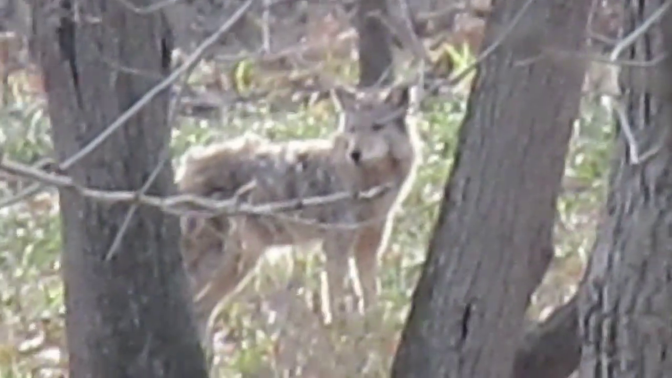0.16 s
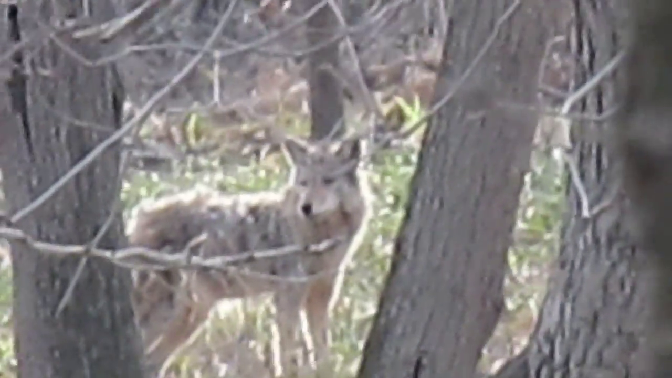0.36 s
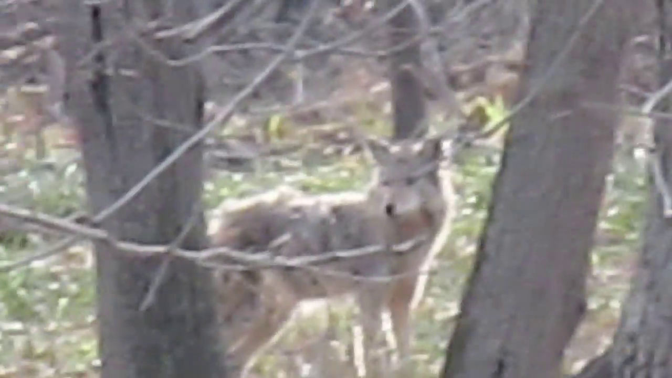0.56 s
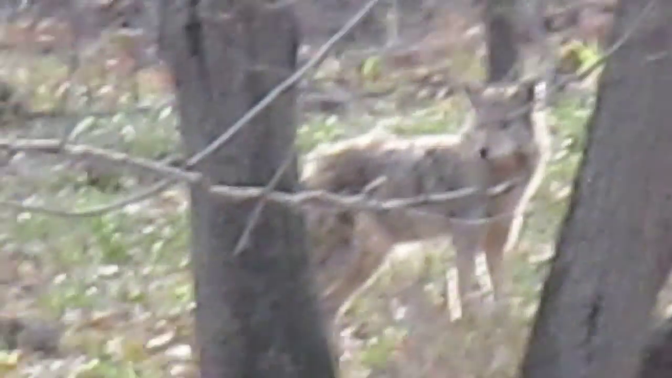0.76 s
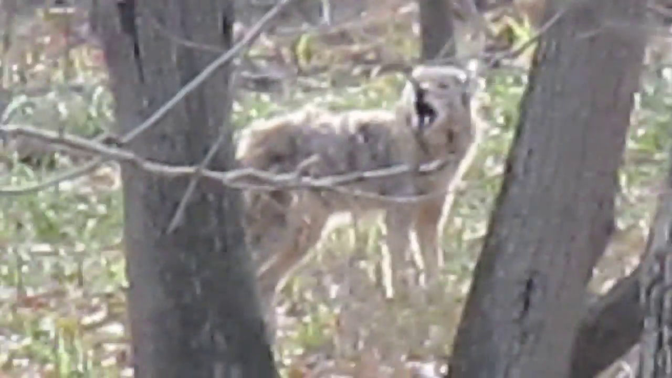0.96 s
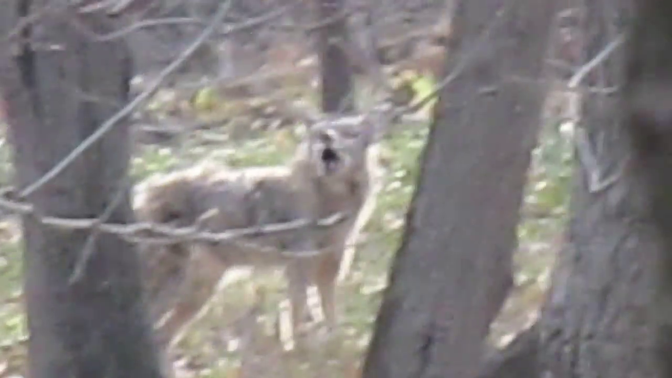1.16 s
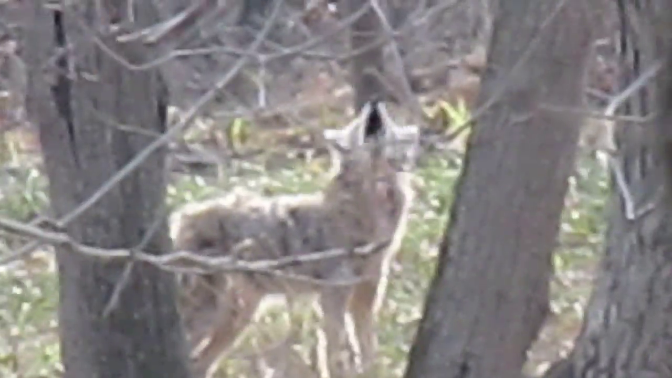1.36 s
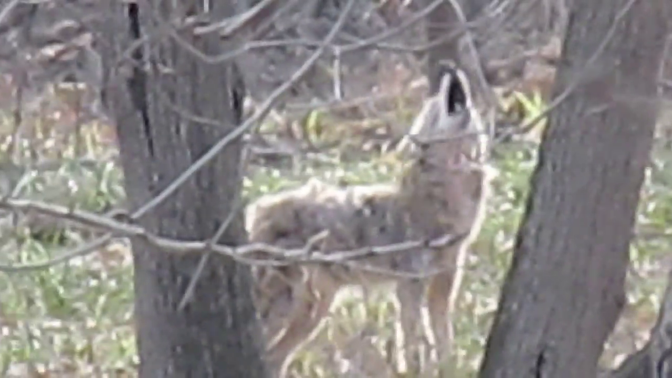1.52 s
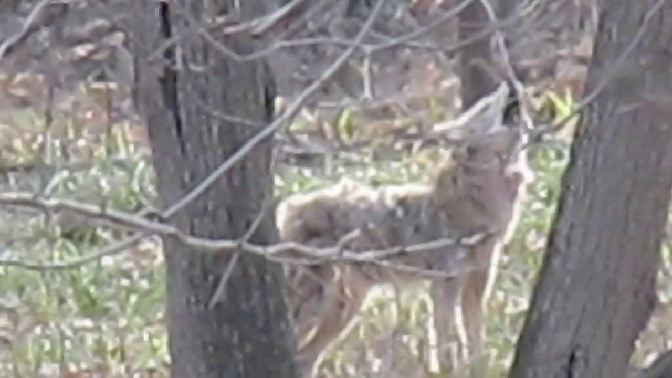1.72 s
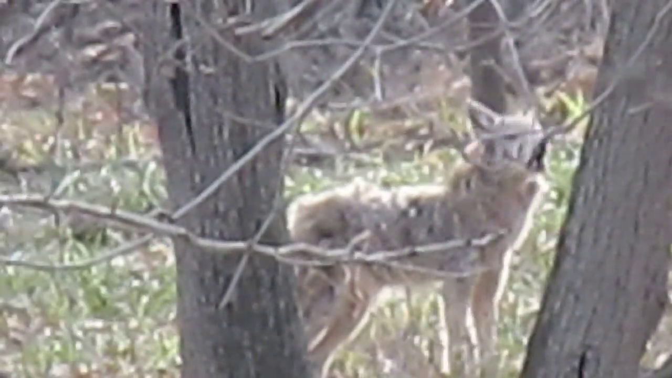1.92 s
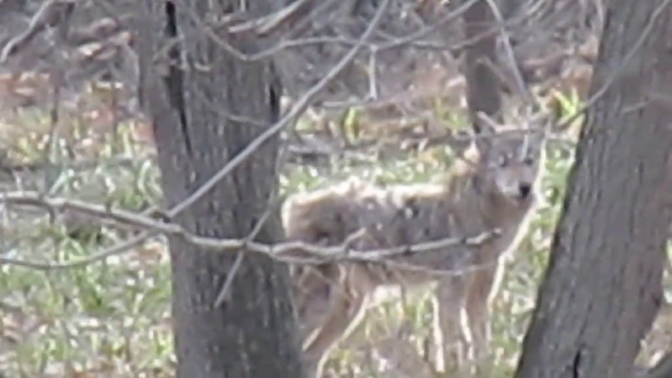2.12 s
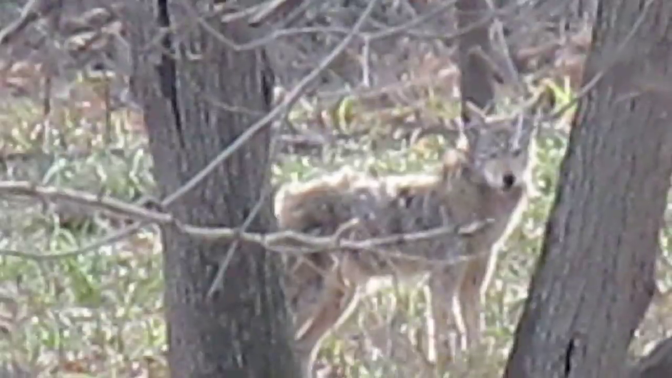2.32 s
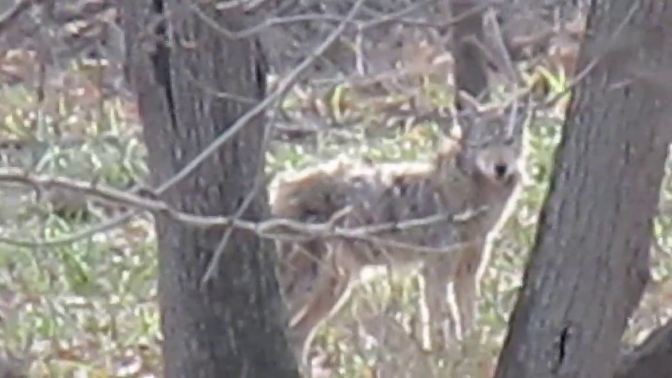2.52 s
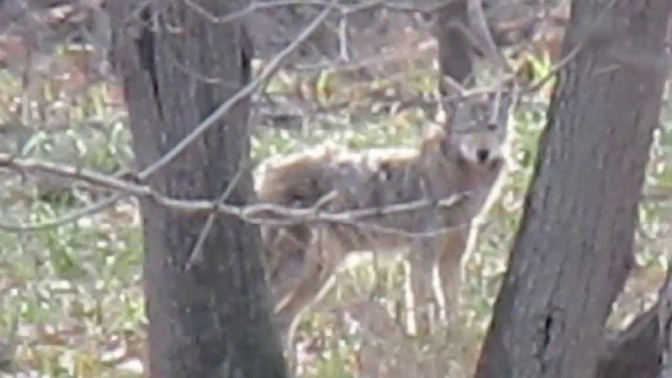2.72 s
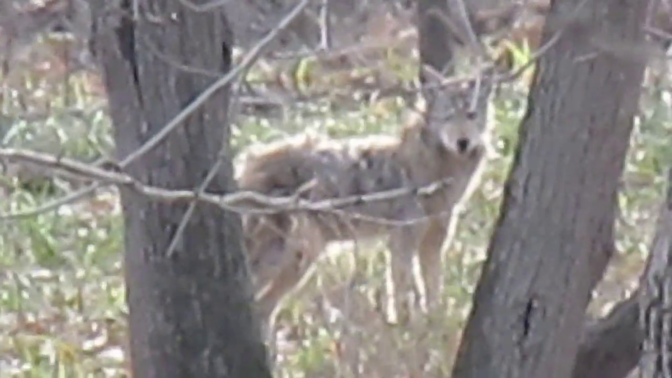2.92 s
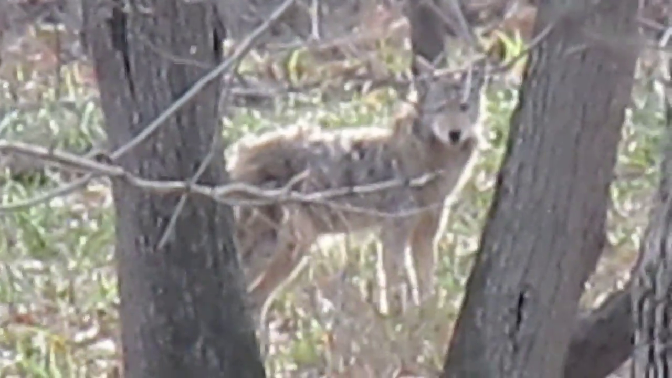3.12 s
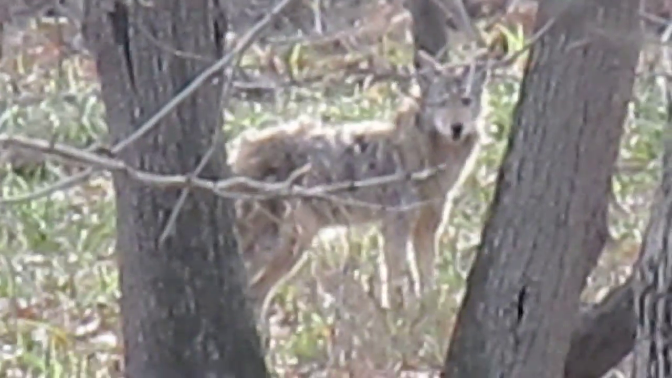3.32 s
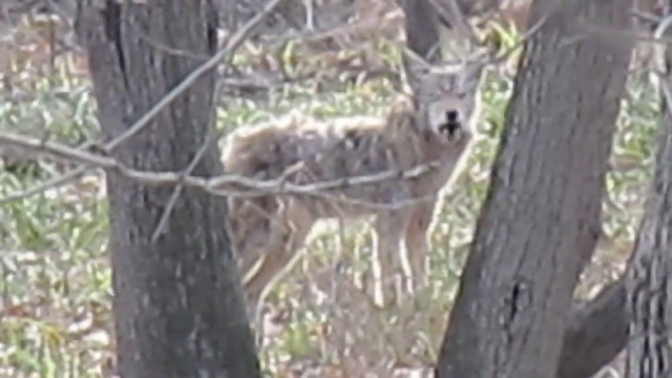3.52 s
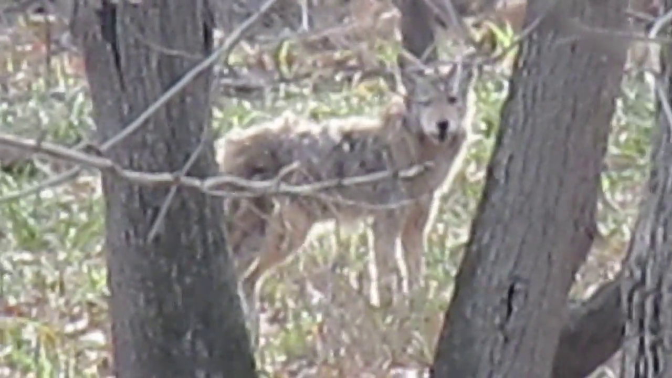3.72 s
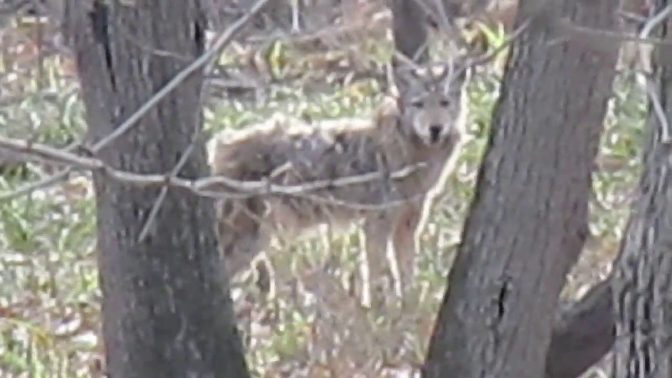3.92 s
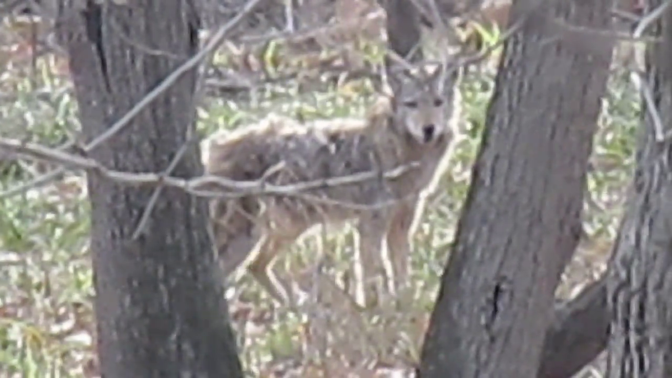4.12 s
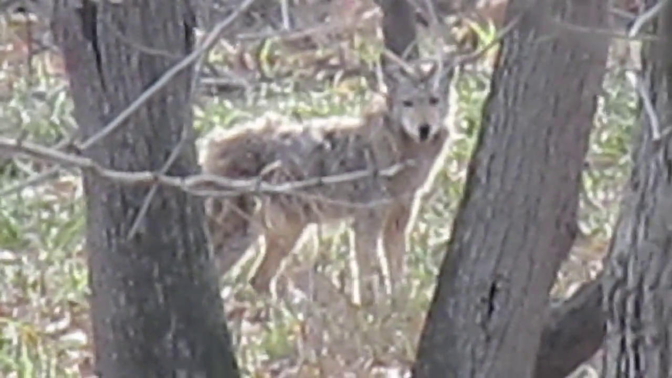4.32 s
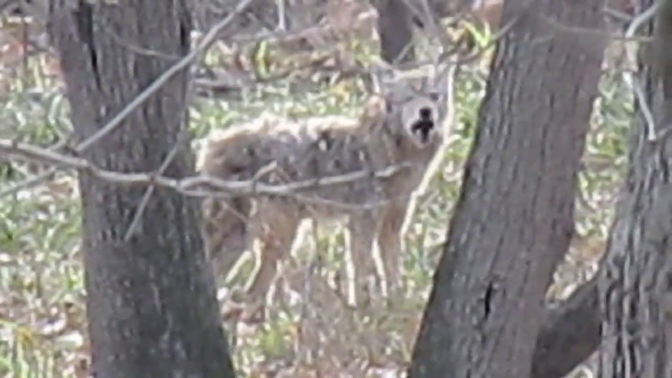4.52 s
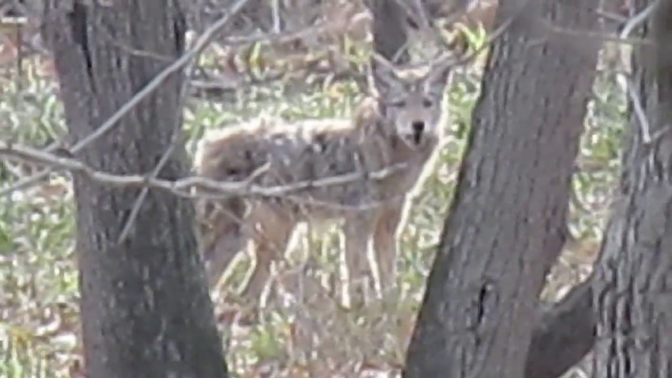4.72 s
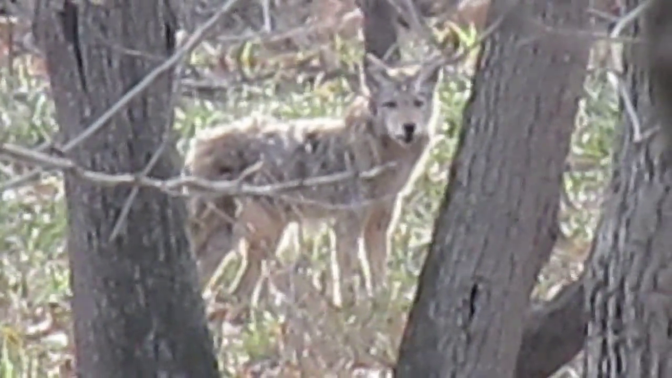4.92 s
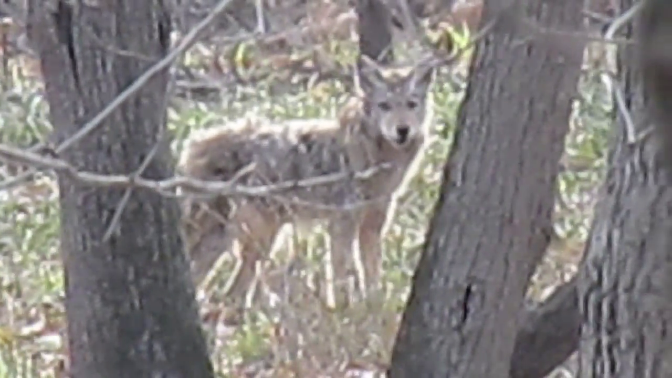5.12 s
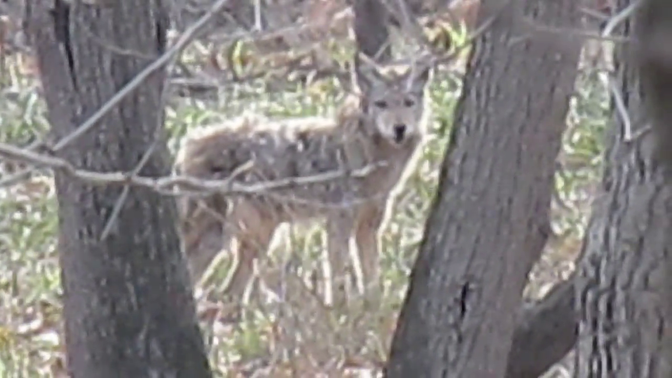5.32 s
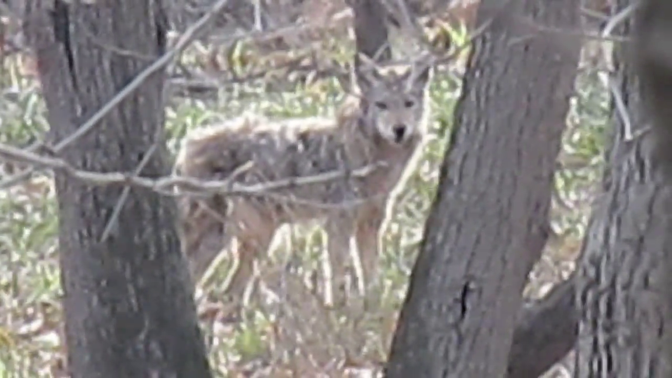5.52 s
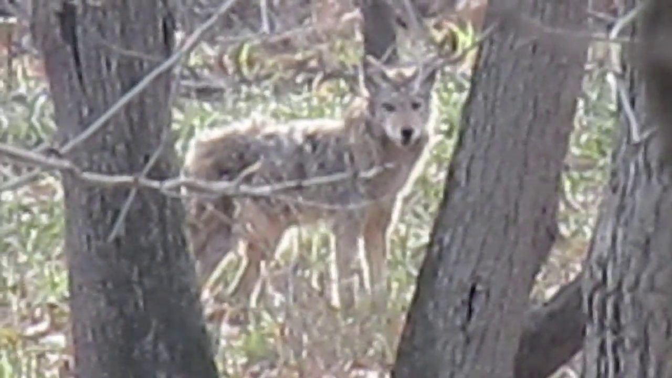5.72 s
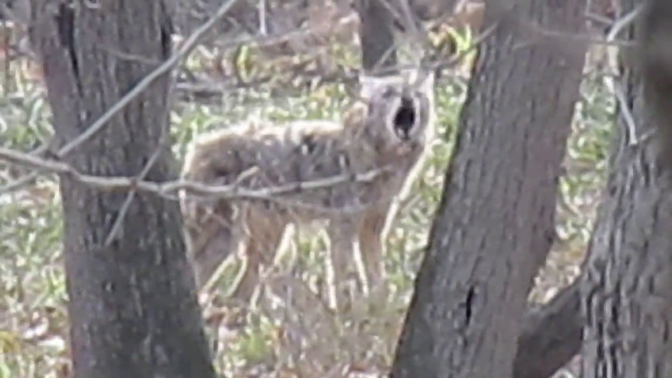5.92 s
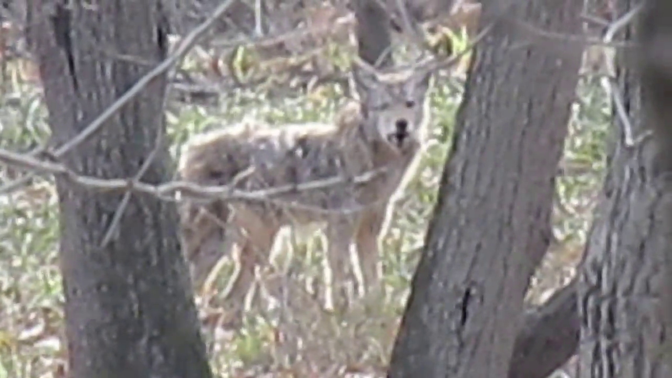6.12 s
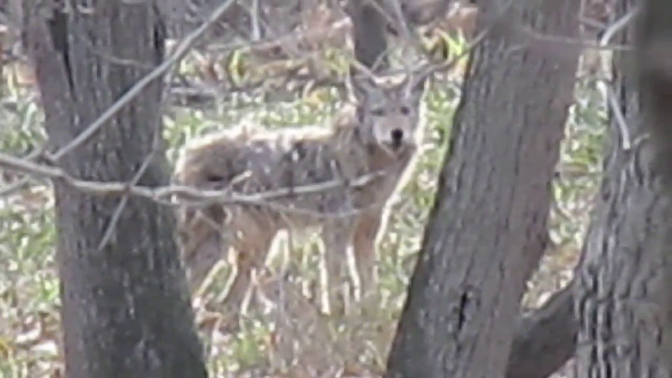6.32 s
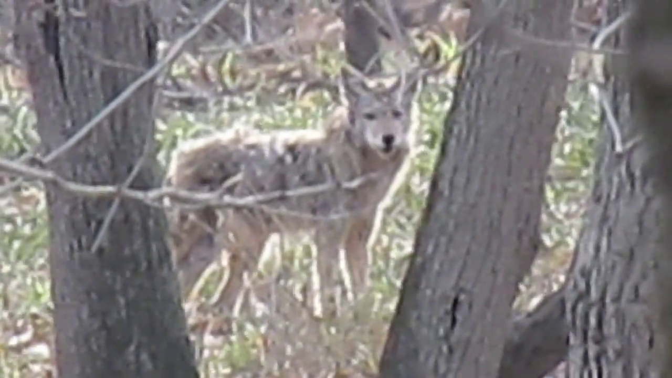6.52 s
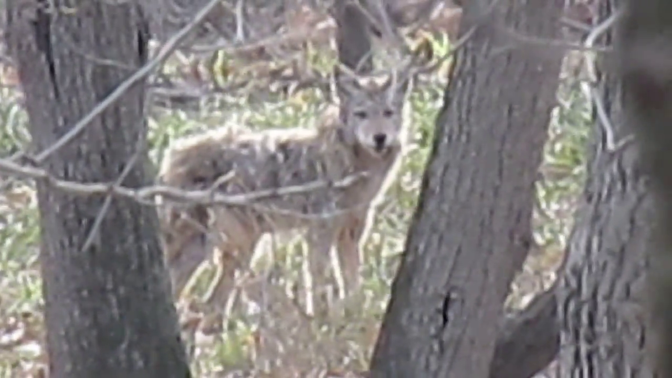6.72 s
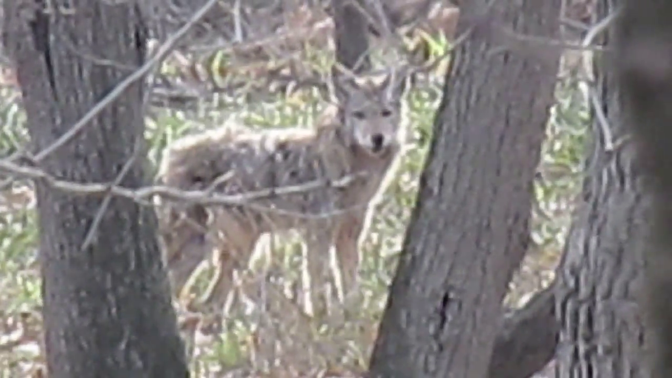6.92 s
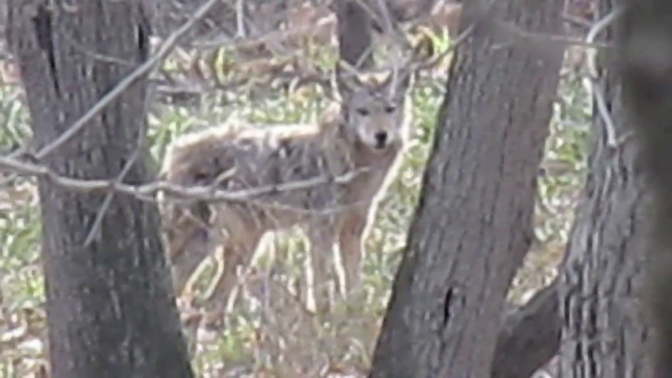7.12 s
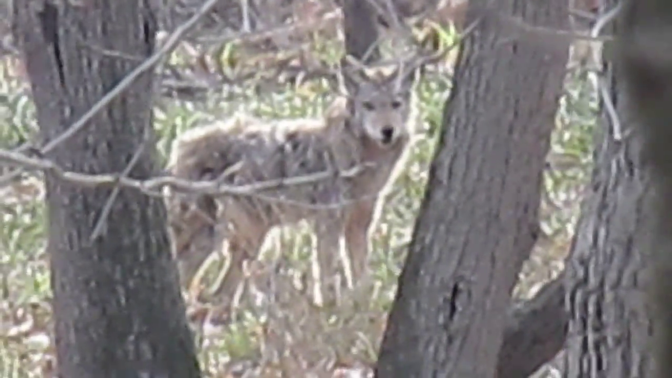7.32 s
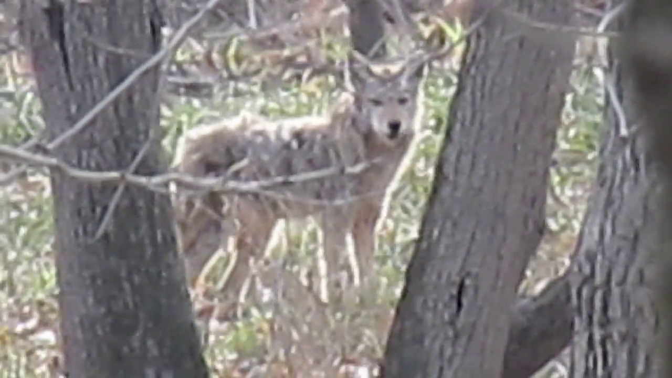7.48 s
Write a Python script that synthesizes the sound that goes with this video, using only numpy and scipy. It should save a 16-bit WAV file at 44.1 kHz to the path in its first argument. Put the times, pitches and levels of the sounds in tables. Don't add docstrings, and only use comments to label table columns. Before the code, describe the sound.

Sharp coyote barks and a quick run of yips ring among trees, answered by a dog's low woofs, rustling leaves and faint distant road rumble.

```python
import sys
import numpy as np
from scipy import signal
from scipy.fft import rfft, irfft, next_fast_len
from scipy.io import wavfile
from scipy.ndimage import uniform_filter1d, map_coordinates

SR = 44100
rng = np.random.default_rng(int(sys.argv[2]) if len(sys.argv) > 2 else 0)


def convert_level_to_amplitude(level_db):
    exponent = np.asarray(level_db, float) / 20
    return 10 ** exponent


def wrap_up_sound(samples):
    columns = np.atleast_2d(samples).T
    tamed = np.clip(columns, -1, 1)
    steps = np.round(tamed * 32767).astype(np.int16)
    wavfile.write(sys.argv[1], SR, steps)


N = 332955

# t/s, level/dB
TRAFFIC = [
    (0.0, 0),
    (2.0, 0.8),
    (3.5, -0.5),
    (6.0, 0.86),
    (7.55, 3.5),
]
# f/Hz, level/dB
RUMBLE = [(12, -36), (20, -17), (43, 2.5), (65, -0.5), (92, -0.5), (119, -4), (195, -14), (222, -21),
          (350, -24.5), (460, -39), (770, -120)]
HUM = [(150, -6.5), (250, 2.5), (344, -3.5), (380, -1), (592, -5), (852, -9), (1040, -9), (1820, -22),
       (3500, -37.5), (4550, -60.5), (7700, -120)]
HISS = [(1760, -28), (3000, -8), (3440, -2.5), (3950, -1.5), (4900, -5), (9510, -3), (15600, -8.5)]
# f/Hz, likeness/0-1
ALIKE = [(25, 0.15), (60, 0.86), (180, 0.87), (550, 0.75), (1650, 0.26), (5000, .09)]

# t/s, level/dB, rise t/s, fade/dB per s, low crunch level/dB
SCUFFS = [(2.09, -52, .09, 79, -1), (2.138, -40.5, .012, 86, -4), (2.4, -43, .008, 289, -10),
          (2.47, -47.5, .015, 48, 0.5), (2.63, -45.5, .06, 493, -12.5), (2.678, -47, .03, 108, 2),
          (2.798, -50, .015, 20.5, 3.5), (2.95, -44, .12, 102, -8), (3.0, -47.5, .02, 77, -23),
          (3.21, -47, .05, 159, -2), (3.35, -41.5, .015, 200, -1.5), (3.41, -46.5, .03, 180, 0),
          (3.59, -44, .035, 139, -4.5), (3.709, -47, .05, 150, -3.5), (3.83, -46, .03, 125, -3)]
# f/Hz, level/dB
CRISP = [(3530, -71), (6000, -13), (7880, -8.5), (9060, -12), (9550, -1.5), (13200, -7), (14700, -22),
         (15600, -11.5)]
CRUNCH = [(1470, 2), (2500, 1), (2920, 0.5), (3520, 1.5), (7830, 3), (9000, 11), (11700, -30),
          (19800, -120)]
TWIG = [(2000, 0), (4000, -16), (9000, 4), (12500, -1), (15500, -13)]
# t/s, peak level/dB
SNAPS = [(2.1384, -51), (2.1501, -21), (2.3998, -43), (2.4683, -44), (2.6574, -19), (2.7886, -31),
         (2.835, -36), (2.8452, -20.5), (2.9994, -41), (3.2088, -42), (3.342, -30), (3.348, -29.5),
         (3.5748, -31), (3.8236, -42.5)]

# t/s, peak level/dB, second tag level/dB, high ring level/dB
CLINKS = [(2.1438, -29.5, -6.5, -21.5), (2.4013, -40.5, -7, -17), (2.4294, -42, -5, -32),
          (2.5795, -39.5, -12, -24), (2.5795, -45, -15, -7.5), (2.603, -38, -1.5, -26),
          (2.621, -45.5, -2, -32), (2.6405, -48, -17.5, -20.5), (2.9133, -45, -8, -30),
          (3.3149, -60, 0, -15), (3.6177, -52, -2, -22), (7.225, -56.5, -6.5, -22), (7.2744, -56, -4, -29),
          (7.3194, -61, -10, -18)]
# f/Hz, level/dB, t60/s
TAG_MODES = [(8320, -14, .12), (9300, -12, .08), (10510, .1, .14), (10690, -5, .1), (11950, 6, .14),
             (12020, 3, .12), (15200, 8, .1)]

# f/Hz, t60/s
WOOD_DECAY = [(300, 2.6), (800, 2.24), (1500, 2.08), (3000, 1.08), (6000, 0.12), (12000, .25)]
# f/Hz, level/dB
SCATTER = [(380, -9), (800, -1), (1500, 0), (3000, 1), (6000, 3)]

# t/s, f/Hz, level/dB, jaw closed/0-1
WOOFS = [
    [(.475, 163.6, -25, .95), (.495, 257.2, -37, .95), (.512, 337.8, -24, .85), (.535, 393, -25.5, .15),
     (.575, 423.6, -17, 0.17), (.603, 402.3, -25, .23), (.63, 348, -16.5, .7)],
    [(1.845, 318.3, -25, .6), (1.865, 368.7, -26, .4), (1.892, 407.4, -18.5, .2), (1.922, 435.5, -13.5, .2),
     (1.948, 404.3, -23.5, .03), (1.973, 351.6, -24.5, .35), (2.03, 225, -34.5, .76)],
    [(7.02, 198.7, -37, .95), (7.04, 312.6, -28, .6), (7.06, 367.5, -15.5, .75), (7.084, 383.6, -8, .99),
     (7.107, 376.4, -12, .86), (7.127, 369, -23, 0.68), (7.155, 337, -23.5, 0.4)],
]
# left minus right level/dB, half-pitch level/dB, breath level/dB, tongue f/Hz, tongue level/dB
DOG_COLOUR = [
    (5.5, -32, -33, 510, 0.5),
    (4, -20, -31.5, 1150, 6.5),
    (-1.2, -8, -40.5, 2650, 10),
]
# f/Hz, level/dB
OPEN_THROAT = [(150, -17), (420, -7.5), (830, 2), (1250, -20.5), (1650, -21), (2100, -17), (2500, -60),
               (2950, -18), (3400, -31.5), (4500, -53.5)]
SHUT_THROAT = [(150, 14), (250, 20.5), (380, -3.8), (560, -22.5), (760, -29.5), (1000, -20.5), (1500, -38),
               (1900, -50.5), (2650, -53.5), (3100, -83.5), (4500, -78)]
DOG_BREATH = [(2590, -56), (4400, -45.5), (5260, -9), (5700, -2), (7690, -8.5), (8550, -1.5),
              (10200, -15.5), (11000, -11.5), (11600, -15), (15500, -24)]
# echo level/dB, then the most hoarseness as noise share/0-1
DOG_ECHO_DB = (-14, -12.5, -16)
DOG_HOARSE = (.18, .28, .5)

# top t/s, top f/Hz, level/dB, rise t/s, fall t/s
BARKS = [
    (1.164, 511.5, -22.5, .066, 0.049),
    (3.67, 506.4, -22, 0.056, 0.031),
    (4.727, 488.2, -24, .058, 0.034),
    (6.165, 512.5, -20.5, 0.061, 0.028),
]
YIPS = [
    (1.482, 537.4, -23, 0.056, .058),
    (1.683, 526, -22, .066, .058),
    (1.836, 553.7, -23, .076, .068),
    (2.022, 547, -23.5, .062, .054),
]
# echo level/dB, muzzle raised at the top/0-1, half-pitch level/dB, tongue f/Hz, tongue level/dB
BARK_COLOUR = [(-4, 0.3, -13, 3140, 4.5), (-4.5, 0.34, -19, 2920, 6.5), (-5, 0.32, -30, 2750, 8),
               (-5, 0.28, -18, 3030, 6)]
YIP_COLOUR = [(-3.5, 0.47, -11, 2600, 2.4), (-3, 0.69, -36, 2280, 3.4), (-4.5, 0.76, -32, 1850, 9.1),
              (-6, 0.72, -23, 2400, 2.2)]
# sag, drop_db and muzzle hold (start, end, rise power, fall power) away from the top;
# breath_db and pan_db are level/dB; lift is how far the opening jaw raises resonances with the pitch
BARK_SHAPE = dict(sag=(.2, 0.082, 1.212, 2.05), drop_db=(21.8, 22, 2.38, 2.24), muzzle=(.12, 0.25, 1, 1),
              breath_db=-31.5, pan_db=-4.5, lift=0.42)
YIP_SHAPE = dict(sag=(.27, .35, 1.6, 1.9), drop_db=(11, 23, 4.7, 2.8), muzzle=(.15, .05, 1, 1),
             breath_db=-36.5, pan_db=-4, lift=0.25)
BARK_RASP = (.9, .05, .45)
YIP_RASP = (.6, .03, .4)
BARK_CLEAR = (.27, .3, .5, .33)
YIP_CLEAR = (.9, 1.0, 1.5, 1.4)
# f/Hz, level/dB
BARK_THROAT = [(450, -46.5), (740, 0), (1000, -9.5), (1200, -14), (1480, 16), (1950, -14), (2330, 0),
               (2700, -17), (3030, -8), (3500, -27), (4300, -37.5), (5500, -55)]
HOWL_THROAT = [(450, -42), (800, -19), (1050, -6), (1300, -13), (1650, -17), (1900, -10), (2200, 0),
               (2450, -4), (2750, -14), (3100, -13), (3700, -18), (4200, -36), (5500, -48)]
COYOTE_BREATH = [(2470, -45), (4200, -9.5), (4610, -5.5), (4900, -5), (5490, -8.5), (6660, -10.5),
                 (7370, -2.5), (12000, -26.5), (15600, -59), (22000, -120)]

PORT_LAG = 8


def unit(x):
    return x / np.sqrt(np.mean(x ** 2) + 1e-20)


def along(points, hz):
    f, v = np.transpose(points)
    return np.interp(np.log(hz + 1), np.log(f + 1), v)


def curves(rows, t):
    s, *cols = np.transpose(rows)
    return [np.interp(t, s, c) for c in cols]


def wobble(rate, size):
    knots = rng.standard_normal(int(size * rate / SR) + 4)
    return map_coordinates(knots, [np.arange(size) * rate / SR])


def coloured(x, spectrum):
    size = x.shape[-1]
    m = next_fast_len(size + 2048)
    gain = convert_level_to_amplitude(along(spectrum, np.fft.rfftfreq(m, 1 / SR)))
    return unit(irfft(rfft(x, m) * gain, m)[..., :size])


def spread(spectrum, alike):
    turn = np.arccos(np.clip(along(alike, np.fft.rfftfreq(N, 1 / SR)), 0, 1)) / 2
    pair = rfft(coloured(rng.standard_normal((2, N)), spectrum))
    mid, side = irfft(pair * [np.cos(turn), np.sin(turn)], N)
    return np.array([mid + side, mid - side])


def background():
    swell_db, = curves(TRAFFIC, np.arange(N) / SR)
    rumble_db = -32 + swell_db + 0.22 * wobble(2.73, N)
    hum_db = -43 + 0.3 * swell_db + 1.42 * wobble(3.45, N)
    rumble = convert_level_to_amplitude(rumble_db) * spread(RUMBLE, ALIKE)
    road = rumble + convert_level_to_amplitude(hum_db) * spread(HUM, ALIKE)
    hiss = convert_level_to_amplitude(-64.5) * spread(HISS, [(3000, 0.046)])
    return road * convert_level_to_amplitude([[-.4], [.4]]) + hiss


def grains():
    return rng.standard_normal(N) * convert_level_to_amplitude(2.1 * wobble(900, N) + 0.75 * wobble(40, N))


def leaves():
    t = np.arange(0, N / SR, .001)
    strokes = []
    for s, db, rise_s, fade, _ in SCUFFS:
        fall_db = np.where(t < s, 20 * (s - t) / rise_s, fade * (t - s))
        strokes.append(convert_level_to_amplitude(2 * (db - fall_db)))
    strokes = np.array(strokes)
    powers = strokes.sum(axis=0), convert_level_to_amplitude(2 * np.array(SCUFFS)[:, -1]) @ strokes
    crisp, crunch = (np.interp(np.arange(N) / SR, t, np.sqrt(power)) for power in powers)

    def layer():
        return crisp * coloured(grains(), CRISP) + crunch * coloured(grains(), CRUNCH)

    near, far = layer(), layer()
    tick = np.arange(800) / SR
    for s, db in SNAPS:
        crack = coloured(rng.standard_normal(len(tick)), TWIG) * convert_level_to_amplitude(-60 * tick / 0.013)
        near[round(s * SR):][:len(tick)] += convert_level_to_amplitude(db - 9.5) * crack
    right = convert_level_to_amplitude(-46) * np.roll(near, PORT_LAG) + convert_level_to_amplitude(-7) * far
    return convert_level_to_amplitude(3.5) * np.array([near, right])


def collar():
    out, t = np.zeros(N + SR), np.arange(SR // 4) / SR
    for s, db, second_db, ring_db in CLINKS:
        for hz, level, t60 in TAG_MODES:
            part_db = ring_db if hz > 14000 else second_db if hz > 11300 else 0
            ring = np.sin(2 * np.pi * hz * t + rng.uniform(0, 6))
            ring *= convert_level_to_amplitude(6 * wobble(220, len(t)))
            out[round(s * SR):][:len(t)] += convert_level_to_amplitude(db + level + part_db - 9.5 - 60 * t / t60) * ring
    return out[:N] * convert_level_to_amplitude([[3.5], [-6]])


def echoes(x, gap_s, near_db):
    hz, t, z = signal.stft(rng.standard_normal((2, int(1.9 * SR))), SR, nperseg=256)
    decay = convert_level_to_amplitude(-60 * t / along(WOOD_DECAY, hz)[:, None]) + convert_level_to_amplitude(near_db - 60 * t / 0.44)
    tail = signal.istft(z * decay, SR, nperseg=256)[1]
    tail *= np.clip(np.arange(tail.shape[1]) / SR / gap_s, 0, 1) ** 2
    return signal.fftconvolve(x[None], tail / np.sqrt(SR * .1), axes=1)


def call(controls, throats, breath, fill, blur, lift, half_db, breath_db, tongue_hz, tongue_db):
    t, pitch, level_db, mouth, rasp = controls
    size = len(t)
    pitch, mouth = (uniform_filter1d(c, size=520, mode="nearest") for c in (pitch, mouth))
    level_db = uniform_filter1d(level_db, size=300, mode="nearest")
    phase = 2 * np.pi * np.cumsum(pitch * (1 + .008 * wobble(150, size))) / SR
    lifted = (pitch.max() / pitch) ** lift
    voice, power = np.zeros(size), np.zeros(size)
    for k in np.arange(2, 25) / 2:
        open_db, shut_db = (along(throat, k * pitch * lifted) for throat in throats)
        throat_db = open_db + np.clip(mouth, 0, 1) * (shut_db - open_db)
        throat_db += tongue_db * np.exp(-((k * pitch - tongue_hz) / 260) ** 2)
        share = 1 - (1 - rasp) ** (1 + (k / blur) ** 2)
        half = k % 1 > 0
        line_db = throat_db + half_db * half + 2.5 * wobble(45, size) * (k > 2)
        clear = np.sqrt(1 - share) * convert_level_to_amplitude(line_db)
        hoarse = np.sqrt(share / 2) * convert_level_to_amplitude(fill * throat_db)
        smear = (wobble(350, size) + 1j * wobble(350, size)) / np.sqrt(2)
        turn = np.exp(1j * (k * phase + rng.uniform(0, 2 * np.pi)))
        voice += np.real((clear + hoarse * smear) * turn)
        power += (clear ** 2 + hoarse ** 2) / 2
    voice /= np.sqrt(uniform_filter1d(power, size=900))
    puff = coloured(rng.standard_normal(size) * (1 + 0.2 * np.cos(phase)), breath)
    edge = np.clip(np.minimum((t - t[0]) / .008, (t[-1] - t) / .02), 0, 1)
    return edge * convert_level_to_amplitude(level_db) * (voice + convert_level_to_amplitude(breath_db) * puff)


def animal(calls, voice, gap_s, near_db, slap_s, slap_db):
    out = np.zeros((2, N + 3 * SR))
    for controls, pan_db, echo_db, *colour in calls:
        x = call(controls, *voice, *colour)
        at = round(controls[0][0] * SR)
        out[0, at:][:len(x)] += convert_level_to_amplitude(pan_db / 2) * x
        out[1, at + PORT_LAG * (pan_db > 2):][:len(x)] += convert_level_to_amplitude(-pan_db / 2) * x
        x = irfft(rfft(x) * convert_level_to_amplitude(along(SCATTER, np.fft.rfftfreq(len(x), 1 / SR))), len(x))
        out[:, at + round(slap_s * SR):][:, :len(x)] += convert_level_to_amplitude(slap_db + echo_db) * x
        wet = convert_level_to_amplitude(echo_db) * echoes(x, gap_s, near_db)
        out[:, at:][:, :wet.shape[1]] += wet
    return out[:, :N]


def woof(rows, hoarse):
    t = np.arange(round(rows[0][0] * SR), round(rows[-1][0] * SR)) / SR
    pitch, level_db, jaw = curves(rows, t)
    strain = 22 * (1 - pitch / pitch.max()) ** 2
    return t, pitch, level_db, jaw, np.minimum(.02 + strain, hoarse)


def dog():
    calls = []
    for rows, hoarse, echo_db, (pan_db, *colour) in zip(WOOFS, DOG_HOARSE, DOG_ECHO_DB, DOG_COLOUR):
        calls.append((woof(rows, hoarse), pan_db, echo_db, 0, *colour))
    voice = ((OPEN_THROAT, SHUT_THROAT), DOG_BREATH, .82, 2.3)
    return animal(calls, voice, gap_s=0.018, near_db=12.0, slap_s=.062, slap_db=-3.5)


def arch(row, muzzle_top, shape, rasp, knee):
    top_s, top_hz, level_db, rise_s, fall_s = row
    start_s = top_s - 1.25 * rise_s
    t = np.arange(round(start_s * SR), round((top_s + fall_s) * SR)) / SR
    rising = t < top_s
    away = np.abs(t - top_s) / np.where(rising, rise_s, fall_s)

    def bend(distance, start, end, up, down):
        return np.where(rising, start * distance ** up, end * distance ** down)

    level_db = level_db - bend(away, *shape["drop_db"])
    near = np.minimum(away, 1)
    pitch = top_hz * (1 - bend(near, *shape["sag"]))
    muzzle = muzzle_top - bend(near, *shape["muzzle"])
    start, clear, end = rasp
    rough = bend(near, start - clear, end - clear, 3, 3)
    noise = clear + rough * (1 + knee ** 3) / (near ** 3 + knee ** 3)
    return t, pitch, level_db, muzzle, noise


def coyote():
    kinds = [(BARKS, BARK_COLOUR, BARK_CLEAR, BARK_SHAPE, BARK_RASP),
             (YIPS, YIP_COLOUR, YIP_CLEAR, YIP_SHAPE, YIP_RASP)]
    calls = []
    for rows, colours, knees, shape, rasp in kinds:
        for row, (echo_db, muzzle, half_db, *tongue), knee in zip(rows, colours, knees):
            controls = arch(row, muzzle, shape, rasp, knee)
            calls.append((controls, shape["pan_db"], echo_db, shape["lift"], half_db,
                          shape["breath_db"], *tongue))
    voice = ((BARK_THROAT, HOWL_THROAT), COYOTE_BREATH, .85, 11)
    return animal(calls, voice, gap_s=0.04, near_db=0.5, slap_s=.043, slap_db=-9.5)


def scene():
    return background() + leaves() + collar() + dog() + coyote()


def top_cut(x):
    return signal.sosfilt(signal.butter(12, 15780, fs=SR, output="sos"), x)


def record(dry):
    hz = np.fft.rfftfreq(N, 1 / SR)
    dip = 1 - .9 * np.exp(-((hz - 7920) / 45) ** 2)
    mix = irfft(rfft(dry) * dip * (hz < 15770), N)
    return top_cut(mix)


dry = scene()
out = record(dry)
wrap_up_sound(out)
```